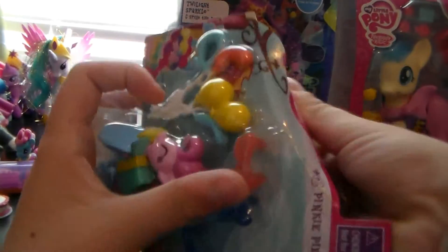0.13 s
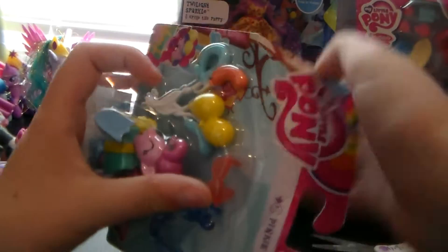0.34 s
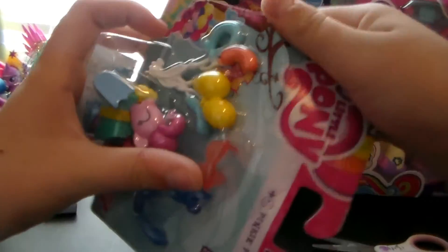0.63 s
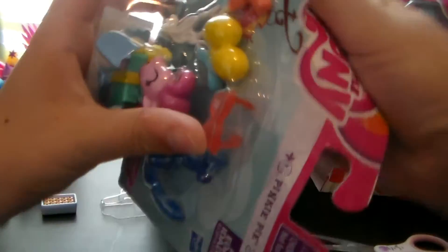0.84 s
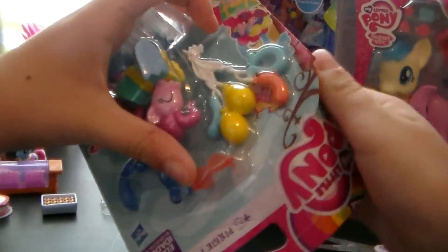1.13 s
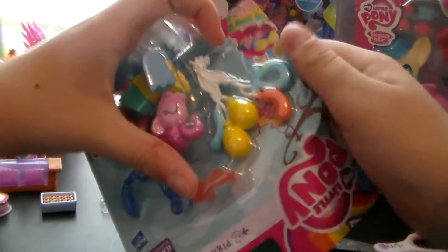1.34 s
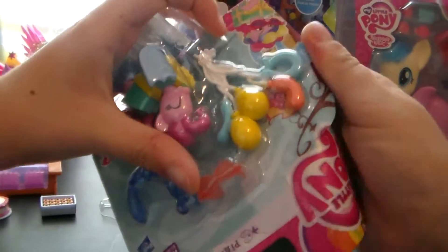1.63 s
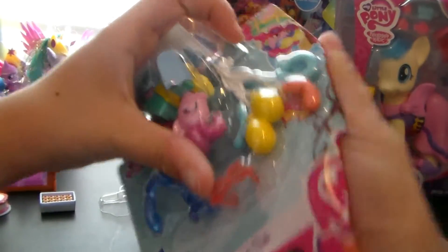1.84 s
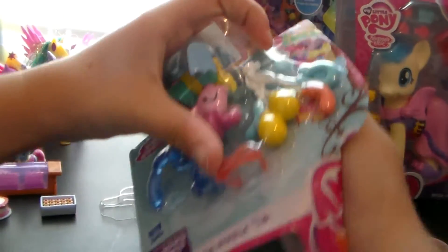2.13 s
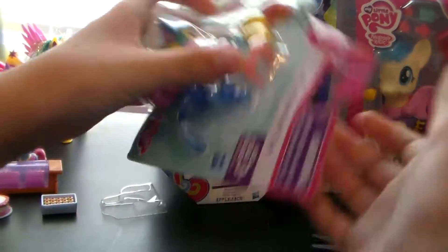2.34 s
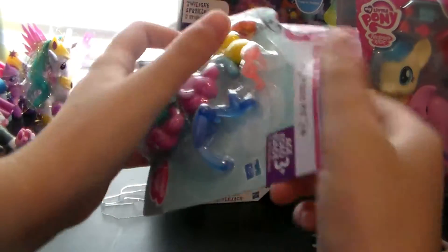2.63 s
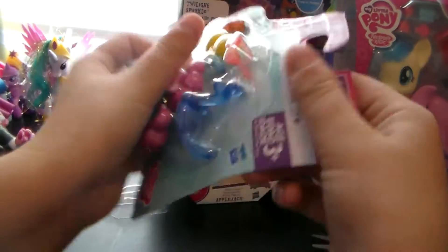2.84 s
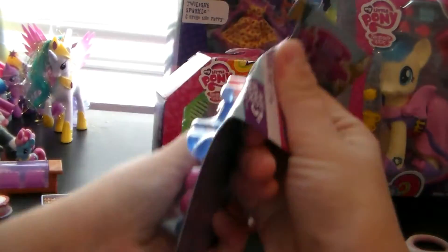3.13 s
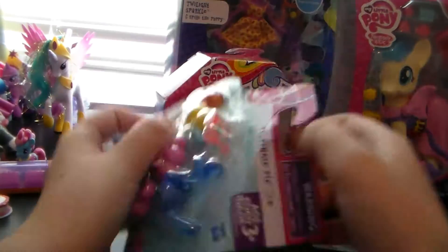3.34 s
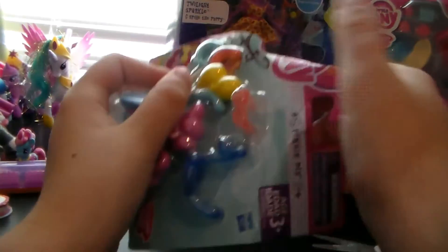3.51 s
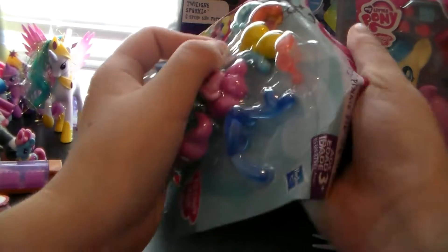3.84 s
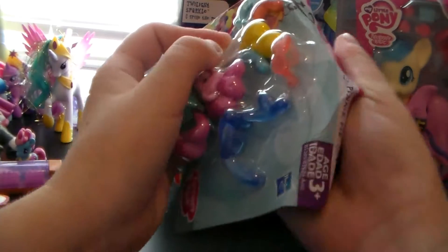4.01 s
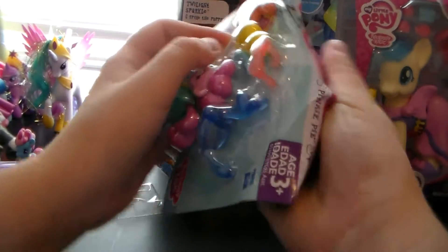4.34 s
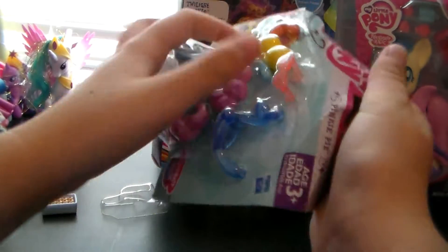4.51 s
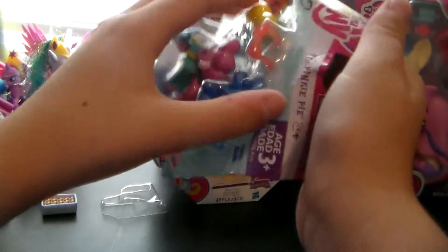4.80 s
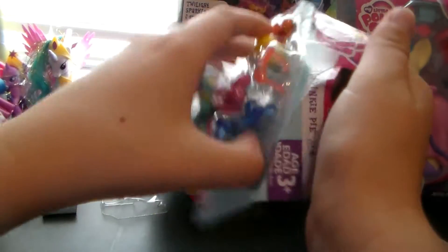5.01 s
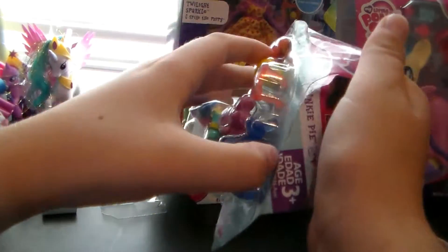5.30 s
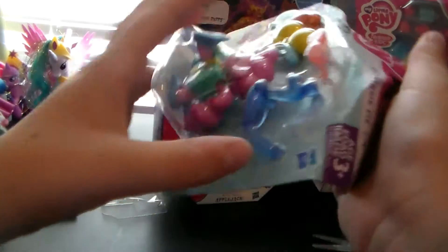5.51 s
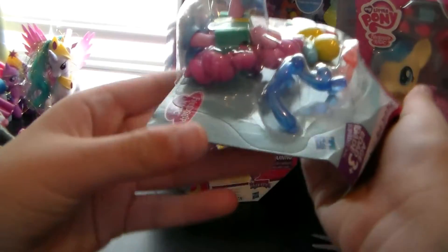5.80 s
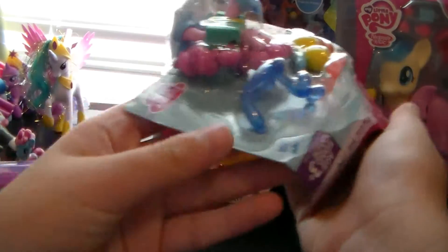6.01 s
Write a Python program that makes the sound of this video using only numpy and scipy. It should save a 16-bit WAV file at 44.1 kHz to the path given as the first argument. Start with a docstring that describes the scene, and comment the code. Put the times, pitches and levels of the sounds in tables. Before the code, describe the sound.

Hands work a stiff plastic toy package off its cardboard backing, close to a stereo microphone in a small furnished room. From the start, fingers rustle and slide on the plastic, with irregular clicks, short crunches and light hollow knocks, over a faint low hum, rumble and hiss. The crackling thickens from 1 second and peaks in loud, sharp snaps around 1.9 and 2 seconds, after which the background dips for about half a second. Scattered lighter cracks follow. A dense crunch with a hollow knock comes at 3.5 seconds, then another loud snap at 3.9 seconds and a near-quiet half second. From 4.4 seconds lighter snaps and crunches resume, with clearer ones around 4.6, 4.9 and 5.3 seconds, thinning to a soft rustle by 6 seconds.

```python
"""Hands pull a clear plastic blister off its card, close to a small stereo microphone in a furnished room.
From the start, fingers rustle and slide on the film over a bed of mains hum, low rumble and hiss.
The stiff shell snaps as dents buckle and crunches in swarms of cracks; fingers knock the hollow pack.
The loudest snaps land near 2 s and 3.9 s, and bed and rustle duck for about half a second each time.
Lighter snaps and crunches follow, thinning to a soft rustle by 6 s."""
import sys
import numpy as np
from scipy import signal
from scipy.fft import rfft, irfft, next_fast_len
from scipy.io import wavfile

SR = 44100
rng = np.random.default_rng(int(sys.argv[2]) if len(sys.argv) > 2 else 0)


def unload_wav(signal):
    """Save mono or channel-first audio to the path in sys.argv[1] as 16-bit WAV at rate SR, clipped to [-1, 1]."""
    wavfile.write(
        sys.argv[1],
        SR,
        np.round(np.clip(np.atleast_2d(signal).T, -1, 1) * 32767).astype(np.int16),
    )


N = 271656


def from_db(db):
    """Gain of a level in dB."""
    return 10 ** (np.asarray(db) / 20)


def rms_one(x):
    """Normalises to rms 1."""
    return x / np.sqrt(np.mean(x ** 2) + 1e-20)


def automation(rows):
    """Draws breakpoint columns as curves, one value a sample."""
    times, *columns = np.transpose(rows)
    return [np.interp(np.arange(N) / SR, times, column) for column in columns]


def drift(rate_hz):
    """Smooth random modulation of rms 1."""
    r = np.exp(-80 * np.pi * rate_hz / SR)
    noise = rng.standard_normal(N // 40 + 2002)   # one value every 40 samples
    slow = signal.lfilter([1], [1, -2 * r, r * r], noise)[2000:]
    return np.interp(np.arange(N) / 40, np.arange(len(slow)), rms_one(slow))


def resonance(x, hz, width_hz):
    """Two-pole resonator, unity gain at its peak."""
    r = np.exp(-np.pi * width_hz / SR)
    poles = [1, -2 * r * np.cos(2 * np.pi * hz / SR), r * r]
    return signal.lfilter(np.array([1, 0, -1]) * (1 - r * r) / 2, poles, x)


def passband(x, low_hz, high_hz):
    """Butterworth band-pass."""
    sos = signal.butter(2, [low_hz, min(high_hz, SR / 2.2)], "band", fs=SR, output="sos")
    return signal.sosfilt(sos, x)


def lowpass(x, hz):
    """Butterworth low-pass."""
    return signal.sosfilt(signal.butter(2, min(hz, SR / 2.2), fs=SR, output="sos"), x)


def grains(size, density, spread_db):
    """Random clicks on a share `density` of the samples, a few of them much louder."""
    chance, strength, polarity = rng.random((3, size))
    gain = from_db(-spread_db * np.log(np.maximum(strength, .01)))
    return (chance < density) * gain * np.sign(polarity - .5) + 1e-9


def random_lag():
    """A crack's position offsets the channels by up to one sample, heard only in the treble."""
    return round(np.clip(rng.normal(0, 0.63), -1, 1))


def add(out, sound, at_s, lag=0):
    """Mixes a sound into both channels, the left one `lag` samples later."""
    i = max(round(at_s * SR), 2)
    for channel, start in zip(out, (i + lag, i)):
        channel[start:start + len(sound)] += sound[:N - start]


def hum(hz=59.2):
    """Mains tone, wavering slightly in pitch and level."""
    phase = 2 * np.pi * np.cumsum(hz + 1.1 * drift(6.7)) / SR
    return np.sqrt(2) * np.sin(phase) * from_db(0.74 * drift(2.0))


# EQ curve of the room's rumble: f/Hz, relative level/dB
RUMBLE_EQ = [(12, -29.5), (20, -10.5), (43, -7.5), (69, -16), (87, -14.5), (108, -10.5), (161, -22),
             (277, -21), (541, -31.5), (900, -45), (1170, -81), (1980, -120)]


def rumble():
    """Low room noise, almost mono."""
    hz = np.maximum(np.arange(N // 2 + 1) * SR / N, 1)
    eq_hz, eq_db = np.transpose(RUMBLE_EQ)
    colour = from_db(np.interp(np.log(hz), np.log(eq_hz), eq_db))
    mid, side = irfft(rfft(rng.standard_normal((2, N))) * colour, N)
    return rms_one(mid + 0.1 * side * [[1], [-1]])


def hiss():
    """Broadband hiss, wide in stereo."""
    mid, side = passband(rng.standard_normal((2, N)), 300, 16000)
    return rms_one(mid + 1.2 * side * [[1], [-1]])


# Modes of shell and card: f/Hz, width/Hz, gain/dB
SHELL_MODES = [(416, 200, 4.5), (854, 182, 14), (1590, 620, 5.5), (2680, 710, 11.5), (4146, 2540, 1),
               (6850, 400, 4.5)]


def shell(x):
    """Rings the shell and card; soft plastic radiates little above its modes."""
    modes = (from_db(db) * (-1) ** k * resonance(x, hz, width_hz)
             for k, (hz, width_hz, db) in enumerate(SHELL_MODES))
    return lowpass(sum(modes), 7800)


# Fader moves for fingers and tearing card: t/s, base mid level/dB, base treble level/dB
RUSTLE_LEVELS = [(0.0, -44, -56.5), (0.17, -53.5, -46.5), (0.5, -52, -53), (0.7, -60.5, -71),
                 (0.9, -58, -62.5), (1.08, -48, -42.5), (1.3, -68, -72.5), (1.44, -53.5, -63.5),
                 (1.85, -54, -59), (2.5, -67.5, -76), (2.85, -54.5, -108), (3.05, -67, -53.5),
                 (3.3, -72.5, -65), (3.55, -43, -54.5), (3.75, -52.5, -54.5), (3.92, -63.5, -72.5),
                 (4.56, -60.5, -100), (5.13, -60.5, -54.5), (5.46, -65, -74), (5.66, -53, -62),
                 (5.8, -67.5, -72), (6.16, -60, -59.5)]


def rustle():
    """Fine uneven friction with sparse crackle: mono mids, wider treble."""
    mid_db, treble_db = automation(RUSTLE_LEVELS)
    surges = drift(19)
    fine = rms_one(grains(N, density=.3, spread_db=2.3))
    gritty = fine + 0.35 * rms_one(lowpass(grains(N, density=0.011, spread_db=1.8), 2000))
    mid = rms_one(rms_one(shell(gritty)) + .5 * rms_one(passband(gritty, 330, 3100)))
    side = rng.standard_normal(N) * [[.6], [-.6]]
    # skin catches for a few ms
    catches = rms_one(lowpass(np.abs(grains(N, density=0.00074, spread_db=2.7)), 110))
    treble = rms_one(passband((fine + side) * (1 + 0.47 * catches), 2700, 13000))
    treble += (from_db(2.4 * drift(25)) - 1) * passband(treble, 7000, 18000)   # the top flickers
    return from_db(mid_db + 3.5 * surges) * mid + from_db(treble_db + 2.0 * surges) * treble


# Skin sliding on the film: start t/s, end t/s, mid-stroke rms level/dB, f/Hz, width/Hz
SLIDES = [(0.024, 0.052, -32.5, 1270, 119), (0.738, 0.798, -52, 3300, 2000),
          (3.059, 3.16, -50.5, 3250, 1500), (3.074, 3.166, -51, 6260, 1500),
          (4.361, 4.444, -59.5, 1100, 290), (4.44, 4.494, -43.5, 2770, 1680)]


def slides():
    """Stick-slip grains sing through one resonance, fading in and out."""
    out = np.zeros((2, N))
    for start, end, rms_db, hz, width_hz in SLIDES:
        size = round((end - start) * SR)
        slips = grains(size, density=0.042, spread_db=0.67)
        rub = rms_one(resonance(resonance(slips, hz, width_hz), hz, 2 * width_hz))
        add(out, from_db(rms_db) * rub * np.sqrt(np.hanning(size)), start)
    return out


def panel(x, hz, q, neighbour_gain):
    """The flexed panel rings at its pitch, with two neighbouring modes that change with every grip."""
    neighbour_hz = np.minimum(hz * np.exp(rng.uniform(0.12, 0.8, 2) * [-1, 1]), SR / 3)
    shares = rng.random((2, len(x))) < .5   # each neighbour takes a random half of the hit
    main = resonance(resonance(x, hz, hz / q), hz, hz)
    neighbours = sum(rms_one(resonance(x * share, f, f / q)) for f, share in zip(neighbour_hz, shares))
    return rms_one(rms_one(main) + neighbour_gain * lowpass(neighbours, 2.0 * hz))


# Single dents buckling: t/s, peak level/dB, panel f/Hz, treble crack level/dB re the ring
SNAPS = [(0.037, -25, 1230, -38), (0.1485, -36, 5200, 4), (0.2025, -38, 6070, -3), (0.2319, -29, 1560, -10),
         (0.267, -29, 5000, 6), (0.3049, -21.5, 1040, -13), (0.347, -25, 2300, -27),
         (0.3617, -24, 2720, -18), (0.3713, -34, 2350, -19), (0.386, -21.5, 9900, -12),
         (0.451, -20, 2720, -30), (0.464, -25.5, 1140, -9), (0.5049, -27, 1770, -22),
         (0.6189, -28, 2480, -1), (0.6486, -29.5, 1820, -31), (0.7082, -33, 3340, -16),
         (0.866, -32.5, 2100, -35), (0.8828, -28, 1710, -39), (0.99, -26, 1770, -14), (1.01, -38, 3400, -4),
         (1.0501, -21, 1110, 5), (1.0565, -18.5, 2530, -5), (1.0668, -20.5, 1770, -17),
         (1.119, -20.5, 2780, -10), (1.2133, -30.5, 2410, -33), (1.3284, -31, 1500, -16),
         (1.379, -29.5, 915, -23), (1.4025, -22, 2960, -28), (1.417, -22, 3700, -3),
         (1.5155, -19.5, 1290, -40), (1.562, -36, 2400, -17), (1.5788, -32.5, 1500, -13),
         (1.6244, -23.5, 1030, -16), (1.6838, -21.5, 2300, -16), (1.7092, -17.5, 3380, -20),
         (1.7113, -13, 1210, -31), (1.7225, -24, 2920, -24), (1.738, -23.5, 826, -14),
         (1.7857, -26, 1090, -22), (1.7905, -13, 2900, -13.5), (1.8028, -13, 1090, -7),
         (1.818, -27, 2350, -20), (1.8858, -33.5, 1900, -40), (1.9011, -4, 2450, -1.5),
         (1.901, -9.5, 940, -24), (2.0393, -6.5, 2720, -5), (2.0406, -4, 1855, 3.5), (2.0425, -11, 1920, 3),
         (2.053, -25, 2600, -26), (2.166, -24.5, 2420, -10), (2.2777, -34, 4100, -10),
         (2.3543, -37.5, 2500, -6), (2.3638, -37.5, 1090, -18), (2.4298, -34, 1390, -29),
         (2.675, -23, 2380, -31), (2.759, -26.5, 1350, -22), (2.797, -39, 2500, -1),
         (2.8617, -34.5, 1980, -32), (2.912, -37, 2580, -15), (3.0265, -31, 1920, -23),
         (3.047, -29, 935, -20), (3.0679, -22.5, 2850, -25), (3.1548, -26.5, 3500, -9.5),
         (3.161, -23.5, 735, -13.5), (3.1922, -13.5, 3160, -11), (3.4106, -32, 1480, 5),
         (3.4443, -22, 2380, 2), (3.467, -27, 2300, -14), (3.475, -20, 3230, -27), (3.5, -12.5, 834, -45),
         (3.556, -32, 2600, -29), (3.58, -20, 3050, -42), (3.5858, -25.5, 3400, -36),
         (3.6585, -17, 2330, -28.5), (3.722, -26.5, 1870, -32.5), (3.8028, -27, 875, -27),
         (3.8132, -25.5, 2220, -33), (3.8813, -5, 2140, -3.5), (4.1914, -45, 3585, -21),
         (4.207, -48.5, 1090, -19.5), (4.441, -33, 2130, -33), (4.4508, -22.5, 2170, -2),
         (4.4572, -25.5, 3550, -27), (4.4863, -32, 1870, -16), (4.5057, -25, 2560, -12),
         (4.6173, -16, 12300, -7), (4.617, -27, 1850, -20), (4.628, -29, 10000, -6),
         (4.647, -27.5, 910, -6), (4.7066, -28, 1920, -31), (4.785, -37.5, 1450, -9),
         (4.856, -27, 2860, -12), (4.901, -19.5, 1900, -25), (4.9041, -19.5, 2010, -25),
         (4.9094, -21, 2300, -2), (4.9133, -19.5, 1100, -18), (4.965, -37, 5560, -8),
         (5.114, -24, 882, -28), (5.2883, -14, 2370, -3), (5.2892, -24, 4300, -12),
         (5.389, -32.5, 2320, -1.5), (5.4791, -32.5, 1340, -32), (5.6391, -25.5, 3560, -40),
         (5.647, -25.5, 1020, -34), (5.7176, -31, 1830, -3), (5.7603, -36, 1050, -19),
         (5.824, -33, 2780, -5), (5.9607, -38.5, 1610, -14)]


def snaps(rows):
    """A sharp release and a millisecond of aftershocks ring the buckled panel and the whole shell."""
    out, t = np.zeros((2, N)), np.arange(1200) / SR
    for at_s, peak_db, hz, treble_db in rows:
        size = from_db(peak_db / 2)   # big dents hit harder, ring more broadly and crack duller
        jerk = rng.standard_normal(len(t)) * np.exp(-t / 0.001)
        jerk[10] -= 2.9 + 3.1 * size   # the release
        ring = panel(jerk, hz, q=max(3.0 - 0.95 * size, 1), neighbour_gain=.3)
        # high-pitched dents leave the shell's low modes quiet
        ring += 0.44 * rms_one(passband(shell(jerk), 0.43 * hz, max(5000, hz)))
        crack = passband(jerk, 4500, 17000 - 9000 * size)
        sound = ring / np.abs(ring).max() - from_db(treble_db) * crack / np.abs(crack).max()
        add(out, from_db(peak_db) * sound / np.abs(sound).max(), at_s, random_lag())
    return out


# Swarms of cracks: crest t/s, level/dB, decay/ms per 6 dB (1 at least), panel f/Hz, fizz/dB re the body
CRUNCHES = [(0.037, -30, 6.5, 1365, -11.5), (0.11, -45.5, 27, 4000, 12), (0.3, -33, 6, 1690, -16),
            (0.348, -42.5, 48, 1980, -24), (0.479, -34, 7, 1900, -12), (0.51, -35, 7.5, 1330, -16),
            (0.535, -36, 5.5, 1950, -18), (1.011, -41, 8, 3300, 6), (1.054, -34.5, 8.5, 2620, 1),
            (1.108, -44.5, 16, 2500, 5), (1.121, -33.5, 5, 2250, 2), (1.201, -45, 12, 2170, -16),
            (1.261, -44, 4.5, 2550, -14), (1.374, -40, 24, 2000, -13), (1.414, -34.5, 11.5, 2550, -5.5),
            (1.513, -35, 5, 1460, -23), (1.625, -38, 7, 1430, -10.5), (1.712, -36, 7.5, 1160, -31),
            (1.741, -34, 3, 1100, -16.5), (1.806, -32, 4.5, 1100, -18), (2.043, -30, 12.5, 1743, -1.5),
            (2.401, -48.5, 30, 1580, -11), (2.679, -39, 16, 1750, -12), (2.762, -40, 7, 1590, -16),
            (3.046, -47, 78, 1930, -5.5), (3.163, -33, 8, 1170, -17), (3.196, -46.5, 27, 3270, -35),
            (3.482, -31.5, 3.5, 1520, -11.5), (3.5, -26, 12, 1620, -11), (3.515, -26, 3.5, 2610, -22.5),
            (3.575, -32.5, 7, 3500, -21.5), (3.582, -31, -1, 1080, -18), (3.616, -41, -1, 3600, -24),
            (3.622, -39.5, -1, 1300, -20), (3.713, -34.5, 7, 940, -17.5), (3.721, -39, 9, 826, -11.5),
            (3.737, -36, 8.5, 1440, -10), (3.799, -40.5, 13, 1480, -17.5), (3.885, -44, 16.5, 1830, -4),
            (4.515, -40.5, 14.5, 1560, -16), (4.592, -45, 8.5, 2670, -10), (4.618, -56, 10, 5560, 15),
            (4.64, -43.5, 24, 1800, -6), (4.906, -34, 10.5, 914, -8), (5.116, -41, 17, 1690, -0.5),
            (5.276, -56, 21, 2500, 8.5), (5.288, -42, 14, 1740, -3), (5.762, -44.5, 7.5, 1920, -19)]


def crunches(sudden_attack_ms=1.5, slow_attack_ms=5):
    """Clumps of cracks swell and die away, ringing panel and shell; a snap sets them off suddenly."""
    out, t = np.zeros((2, N)), np.arange(-3000, 5000) / SR
    for at_s, level_db, decay_ms, hz, fizz_db in CRUNCHES:
        on_snap = any(-.001 < at_s - snap[0] < .005 for snap in SNAPS)
        attack_ms = sudden_attack_ms if on_snap else slow_attack_ms   # per 6 dB
        swell = from_db(-6000 * np.where(t < 0, -t / attack_ms, t / max(decay_ms, 1)))
        clumps = from_db(2.58 * rms_one(lowpass(rng.standard_normal(len(t)), 150)))
        cracks = grains(len(t), density=.025, spread_db=1.1) * clumps
        body = rms_one(panel(cracks, hz, q=13.0, neighbour_gain=0.69) + 1.3 * rms_one(shell(cracks)))
        fizz = rms_one(cracks) + clumps * rng.standard_normal(len(t))   # fibres tear between the cracks
        sound = body + from_db(fizz_db) * rms_one(passband(fizz, 2800, 14000))
        start = at_s + t[0]
        skip = max(0, 2 - round(start * SR))   # trim a lead-in that starts before the scene
        add(out, (from_db(level_db) * swell * sound)[skip:], start, random_lag())
    return out


def room(x, t60_s=0.43, wall_cut_hz=8900):
    """Short room reverb: six feedback delays a side, darker on every bounce."""
    size = next_fast_len(N + SR)
    w = 2 * np.pi * np.arange(size // 2 + 1) / size
    damping = 1 / (1 + 1j * w * SR / (2 * np.pi * wall_cut_hz))
    out, spectrum = np.zeros((2, N)), rfft(x, size)
    for channel in out:
        delays_s = rng.uniform(0.0095, 0.033, 6)
        loops = [from_db(-60 * d / t60_s) * damping * np.exp(-1j * w * d * SR) for d in delays_s]
        channel += irfft(spectrum * sum(g / (1 - g) for g in loops), size)[:N]
    return out


def faint_snaps(duck, count, over_rustle_db=15, hz=2300, treble_db=-9.5):
    """Small dents buckle at scattered times and pitches, riding the ducked rustle's level."""
    scatter = rng.standard_normal((count, 3))
    onsets = (np.arange(count) + rng.random(count)) * (N - 1) / count
    peak_db = automation(RUSTLE_LEVELS)[0] + 20 * np.log10(duck) + over_rustle_db
    rows = [(i / SR, peak_db[int(i)] + 1.7 * loud, hz * np.exp(0.32 * high), treble_db + 5.0 * bright)
            for i, (loud, high, bright) in zip(onsets, scatter)]
    return snaps(rows)


# Fingers knocking the hollow pack: t/s, level/dB before the envelope, f/Hz
KNOCKS = [(0.305, -36, 300), (1.062, -31, 514), (1.119, -25.5, 300), (1.381, -32.5, 457), (1.626, -30, 333),
          (1.802, -29.5, 402), (1.901, -30.5, 301.4), (2.759, -26, 320), (3.163, -33.5, 292),
          (3.5, -27.5, 202.7), (3.5005, -22, 862), (4.906, -29.5, 336), (5.113, -32.5, 520),
          (5.287, -33.5, 855)]


def knocks():
    """A soft push rings the air inside the pack and, about an octave lower, the card."""
    out, t = np.zeros((2, N)), np.arange(3000) / SR
    envelope = np.exp(-t / 0.0044) * (1 - np.exp(-t / 0.00032))
    for at_s, level_db, hz in KNOCKS:
        ring = np.sin(2 * np.pi * hz * t) + 0.33 * np.sin(2 * np.pi * 0.53 * hz * t)
        add(out, from_db(level_db) * ring * envelope, at_s)
    return out


# Level dips around loud snaps: t/s, depth/dB, hold/s
DUCKS = [(1.896, -12.5, 0.089), (2.024, -20.5, 0.33), (3.525, -5, 0.066), (3.875, -17.5, 0.43),
         (4.867, -5.5, 0.16)]


def ducking(attack_s=0.015, release_s=.11):
    """Gain curve: each dip drops fast, holds and eases back; the deepest wins."""
    t = np.arange(N) / SR
    dips_db = []
    for at_s, depth_db, hold_s in DUCKS:
        attack = np.clip((t - at_s) / attack_s, 0, 1)
        release = np.exp(-np.maximum(t - at_s - hold_s, 0) / release_s)
        dips_db.append(depth_db * attack * release)
    return from_db(np.min(dips_db, axis=0))


def scene():
    """The pack up front, leaning slightly right, over a ducked bed and a steady floor of hiss."""
    duck = ducking()
    pack = snaps(SNAPS) + crunches() + knocks() + slides() + faint_snaps(duck, count=30)
    lows = from_db(-40.5) * hum() + from_db(-49.5) * rumble()
    bed = lows * from_db([[-1.3], [1.2]]) + from_db(-63) * hiss()
    reverb = from_db(-27.5) * room(pack[0] / duck)   # the send rises as the return ducks
    handling = (pack + duck * rustle()) * from_db([[-.4], [.4]])
    return handling + duck * (bed + reverb) + from_db(-65.5) * hiss()


def record(dry):
    """A steep high cut at 14.3 kHz."""
    return signal.sosfilt(signal.ellip(10, .5, 60, 14300, fs=SR, output="sos"), dry)


dry = scene()
out = record(dry)
unload_wav(out)
```